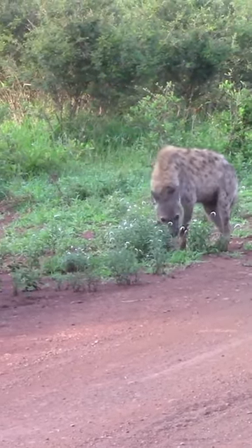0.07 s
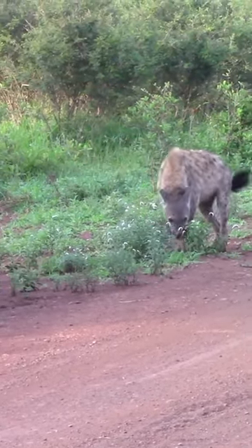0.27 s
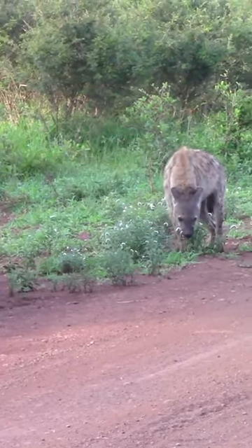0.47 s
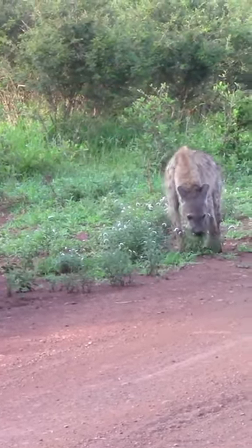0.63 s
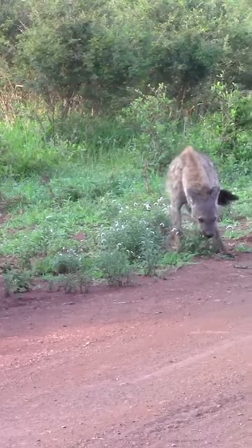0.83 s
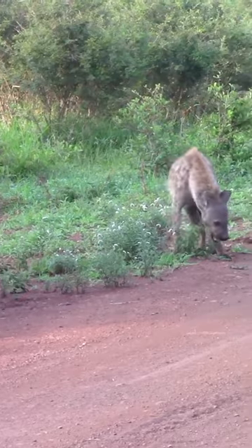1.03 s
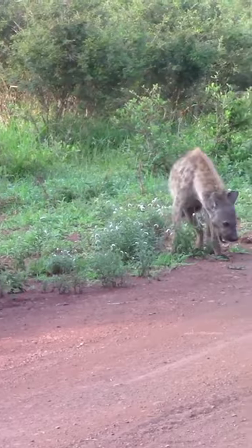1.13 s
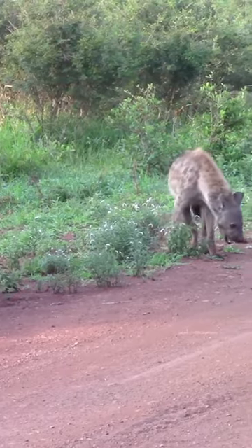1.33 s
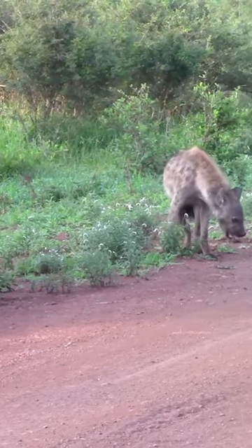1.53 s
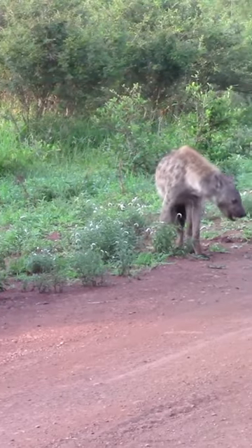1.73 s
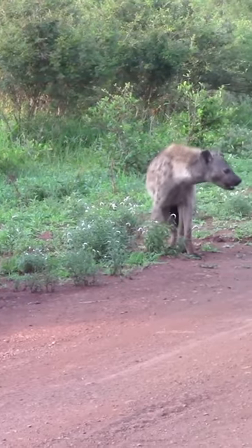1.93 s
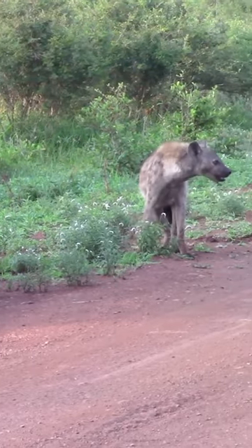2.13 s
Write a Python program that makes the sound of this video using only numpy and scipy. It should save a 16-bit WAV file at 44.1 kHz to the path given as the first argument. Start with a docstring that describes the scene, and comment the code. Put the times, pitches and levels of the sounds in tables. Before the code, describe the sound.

A hyena gives one long whoop a few metres away in open bush. It starts as a soft hoot, swells into a rough growl, then sweeps up to a clear note. Small birds chirp faintly in the distance.

```python
"""A hyena gives one long whoop a few metres away, in open bush beside a dirt road.
The call starts as a clean hoot, the harmonics of the vibrating vocal folds. A second oscillation in the
larynx joins and beats with it into a growl, whose resonances shift as the head is raised. The growl
drops out as the pitch sweeps up to a pure note, and the bushes echo briefly. Throughout, small birds
chirp far off over very quiet air and a faint breeze."""
import sys
import numpy as np
from scipy import signal
from scipy.fft import rfft, irfft
from scipy.io import wavfile
from scipy.ndimage import uniform_filter1d, minimum_filter1d

SR = 44100
rng = np.random.default_rng(int(sys.argv[2]) if len(sys.argv) > 2 else 0)


def store_wav(level_fs):
    """Save 16-bit WAV to argv[1]."""
    pcm = np.round(np.clip(np.atleast_2d(level_fs), -1, 1) * 32767)
    wavfile.write(sys.argv[1], SR, pcm.T.astype(np.int16))


N = 97020
T = np.arange(N) / SR
JITTER_RAD, JITTER_HZ = .22, 60  # phase jitter at full roughness, and its bandwidth


def hyena():
    """Biphonation: two oscillations in one larynx interact. Returns the voice and its hiss."""
    # The hoot. Each row: time in seconds, pitch in Hz, levels of harmonics 1 to 4 in dB.
    hoot_track = [(0, 285, -33.5, -23.5, -38, -27.5), (.05, 296.1, -29.5, -24, -36.5, -39.5),
                  (.236, 300.3, -26.5, -19.5, -33.5, -33), (.39, 306.4, -23, -19, -34, -42.5),
                  (.46, 317.8, -18, -19, -26, -39), (.54, 321.7, -15, -16.5, -23.5, -38.5),
                  (.66, 331, -12, -16.5, -38, -53.5), (.84, 331.8, -12.5, -16.5, -40, -42),
                  (1.02, 340.2, -11.5, -15, -27, -39), (1.08, 335.5, -12, -17, -35, -48.5),
                  (1.12, 341.2, -10, -13.5, -31, -47.5), (1.18, 334.3, -12.5, -18, -34.5, -44),
                  (1.26, 341.9, -11, -15.5, -23.5, -53.5), (1.32, 342.3, -10.5, -12, -37, -57.5),
                  (1.44, 350.6, -10.5, -17, -30.5, -39), (1.56, 362, -9, -11, -38, -42.5),
                  (1.68, 375.5, -16, -24.5, -39.5, -46), (1.75, 388.7, -16, -31, -32.5, -55),
                  (1.8, 422.8, -18, -20.5, -38.5, -39.5), (1.83, 434.4, -7, -32, -47, -43),
                  (1.865, 493.4, -7.5, -26.5, -29, -64.5), (1.902, 535, -7.5, -42.5, -47, -77),
                  (1.93, 494.4, -6, -31, -52.5, -72)]
    # The growl. Each row: time in seconds, relative level in dB, source tilt in dB per octave.
    growl_track = [(0, -49, 6), (.44, -45.5, 15.5), (.5, -24.5, 4), (.56, -12, 5.5), (.66, -11.5, 5),
                   (.86, -9, 2.5), (1.0, -7.5, 3.5), (1.15, -7.5, 1), (1.33, -5.5, 2.5), (1.47, -8, -0.5),
                   (1.62, -4, -3), (1.75, -1.5, -4), (1.81, -2.5, -3), (1.845, -15, 4.5), (1.88, -34, 12.5),
                   (1.93, -24.5, 10.5)]
    # The second oscillation. Each row: time in seconds, ratio of its frequency to the pitch.
    second_ratio = [(.5, .436), (.66, .424), (.76, .428), (1.0, .428), (1.16, .437), (1.25, .426),
                    (1.35, .428), (1.43, .437), (1.6, .444), (1.77, .45), (1.82, .435)]
    # Irregularity of the folds. Each row: time in seconds, roughness from 0 to 1.
    roughness = [(0, .1), (.85, .1), (1.0, .2), (1.12, .6), (1.22, .6), (1.33, .25), (1.46, .5),
                 (1.58, .35), (1.75, .5), (1.85, .9)]
    hz, *harmonic_db = curves(hoot_track)
    growl_db, tilt_db = curves(growl_track)
    ratio, rough = curves(second_ratio)[0], curves(roughness)[0]
    hz = uniform_filter1d(hz, size=600) * (1 + .001 * walk(40))
    phase = 2 * np.pi * np.cumsum(hz) / SR + .06 * rough * walk(JITTER_HZ)
    second = 2 * np.pi * np.cumsum(hz * ratio) / SR + JITTER_RAD * rough * walk(JITTER_HZ)
    coincidence = np.cos(7 * second - 3 * phase)  # slow beat: the ratio lies near 3/7
    tone = hoot(hz, phase, harmonic_db)
    sides = side_tones(phase, second, ratio, rough, tilt_db)
    noise = rasp(hz, coincidence, rough, growl_db, harmonic_db[1])
    growl = throat(undb(growl_db + 1.5 * rough * walk(70)) * sides + noise)
    voice = np.sqrt(2) * (tone + growl) + undb(growl_db - 29) * claps(phase, coincidence, rough)
    attack = np.sin(np.pi / 2 * np.minimum(T / .006, 1)) ** 2
    release = 1 / (1 + np.exp(np.minimum((T - 1.927) / .0025 - 2, 200)))  # the call ends near 1.93 s
    envelope = attack * release
    chest = signal.butter(8, 215, "high", fs=SR, output="sos")
    return signal.sosfiltfilt(chest, voice * envelope, padtype=None), hiss(phase) * envelope


def hoot(hz, phase, harmonic_db):
    """Periodic vibration of the folds gives a harmonic series: four main partials, six faint ones."""
    # Spectral envelope of the upper harmonics. Each row: frequency in Hz, relative level in dB.
    overtones = [(1400, -64.5), (1800, -60.5), (2150, -59), (2400, -71), (2700, -63.5), (3350, -76),
                 (3700, -96)]
    tone = sum(undb(db + .25 * walk(50)) * np.cos(k * phase - 1.2 * k ** 2)
               for k, db in enumerate(harmonic_db, 1))
    fade = np.interp(T, [.4, 1.2, 1.9], [1.3, 1, .1])
    for k in range(5, 11):
        db = np.interp(k * hz, *np.array(overtones).T) + 2 * walk(15)
        tone += fade * undb(db) * np.cos(k * phase + .15 * walk(30))
    return tone


def side_tones(phase, second, ratio, rough, tilt_db):
    """Nonlinear coupling puts sum and difference tones between the harmonics."""
    # Each entry: a signed multiple of the second oscillation's frequency.
    orders = (1, -1, 2, -2, 3, -3, 4, -4)
    # Each entry: the relative level of that order in dB.
    order_db = [3.5, 2, -2, 0.5, -11.5, -5.5, -21.5, -15]
    sides = 0
    for n, db in zip(orders, order_db):
        harmonic_below = np.floor(n * np.median(ratio))
        jitter = JITTER_RAD / 2 * rough * walk(JITTER_HZ)
        beat = n * second - harmonic_below * phase - .27 * n ** 2 + jitter
        tones = sum(undb(tilt_db * np.log2((k + .5) / 2)) * np.cos(k * phase + beat - .15 * k ** 2)
                    for k in range(9))
        sides += undb(db + 1.5 * walk(5)) * tones
    return sides


def claps(phase, coincidence, rough):
    """Impulsive excitation: the folds clap hard when both oscillations close together, and rattle."""
    # Spectrum of a clap. Each row: frequency in Hz, relative level in dB.
    spectrum = [(300, -42), (700, -3), (1200, 7), (1500, 2.5), (1720, -5), (1930, -21.5), (2200, -21.5),
                (2800, -27.5), (3300, -57.5)]
    pulses = sum(np.cos(k * phase) for k in range(1, 11))
    force = np.exp(4 * coincidence) * undb(2 * rough * walk(120))
    return unit(colour(pulses * force, spectrum))


def rasp(hz, coincidence, rough, growl_db, effort_db):
    """Modulated noise: a rasp pulses with the beat, and breath follows the effort of the hoot."""
    pulsing = undb(growl_db - 14) * rough * (1 + .7 * coincidence)
    breath = undb(effort_db - effort_db.max() - 32)
    return rng.standard_normal(N) * (pulsing + breath) * np.sqrt(SR / hz)


def throat(x):
    """Source and filter: the resonances of throat and mouth shift as the animal raises its head."""
    # Response with the head down. Each row: frequency in Hz, gain in dB.
    head_down = [(100, -68), (160, -41), (195, -34), (240, -62), (300, -23), (380, -22), (440, -20.5),
                 (510, -16.5), (610, -18), (715, -16.5), (810, -21), (900, -31.5), (1000, -30.5),
                 (1130, -19), (1165, -30), (1210, -43.5), (1500, -41), (1700, -41.5), (1930, -65),
                 (2170, -52), (2400, -68), (2750, -61.5), (3300, -97.5), (4200, -93.5)]
    # Response with the head raised. Each row: frequency in Hz, gain in dB.
    head_up = [(100, -61), (170, -45), (215, -53), (270, -63.5), (340, -34), (420, -25), (600, -18),
               (760, -22.5), (900, -33.5), (1080, -21), (1200, -36.5), (1400, -35), (1700, -43.5),
               (1950, -62.5), (2200, -57.5), (2800, -71.5), (3300, -101.5)]
    raised = np.interp(T, [1.35, 1.75], [0, 1])
    return (1 - raised) * colour(x, head_down) + raised * colour(x, head_up)


def hiss(phase):
    """Amplitude modulation: treble noise pulses once in each cycle of the folds."""
    # Strength of the hiss. Each row: time in seconds, level in dB.
    level = [(0.0, -70), (0.24, -70), (0.39, -60.5), (1.1, -65), (1.11, -61), (1.68, -78.5), (1.8, -71.5),
             (2.0, -89)]
    # Its spectrum. Each row: frequency in Hz, relative level in dB.
    spectrum = [(2500, -16.5), (3300, 0), (4300, -11.5), (5400, -15), (6200, -1), (6900, -14), (7900, 7),
                (8600, -4), (9600, 1), (11200, 1.5), (12000, -22), (13000, -14)]
    air = rng.standard_normal(N) + .64 * rng.standard_normal((2, N))
    pulsed = colour(air, spectrum) * (1 + .5 * np.cos(phase))
    return undb(curves(level)[0]) * unit(pulsed * undb(2 * walk(25)))


def echoes(call):
    """Reflection: the ground answers first, then the bushes and a thicket, each later and fainter."""
    # Response of the thicket. Each row: frequency in Hz, relative gain in dB.
    response = [(250, -1.5), (400, -1.5), (500, -17.5), (700, 0), (1200, 2.5), (2000, -3.5)]
    ground = undb(-27) * scatter(call, t60=.15)
    bushes = undb(-28) * scatter(delay(call, .03), t60=.16)
    thicket = undb(-40) * scatter(colour(delay(call, .17), response), t60=.02)
    return ground + bushes + thicket


def birds():
    """Scattering by the bushes blurs distant chirps and one nearer trill of falling notes."""
    # Each row: start and length in seconds, first and last frequency in Hz, relative level in dB.
    chirps = [(.01, 0.12, 4680, 3000, -62), (0.02, 0.13, 7000, 6090, -62), (0.146, 0.1, 5570, 5130, -63.5),
              (0.217, 0.055, 4830, 3940, -56.5), (0.334, 0.069, 3880, 3300, -68),
              (0.516, 0.039, 2900, 2720, -47), (0.544, 0.037, 3800, 4385, -57),
              (0.589, 0.044, 3730, 3380, -56), (0.694, 0.032, 2830, 2900, -45),
              (0.751, 0.067, 5300, 5100, -63.5), (0.903, 0.053, 2850, 2641, -44.5),
              (0.954, 0.058, 4470, 4059, -58.5), (1.015, 0.059, 2860, 2700, -47),
              (1.095, 0.075, 7800, 7600, -62.5), (1.11, .07, 6090, 4960, -52.5),
              (1.221, 0.15, 2896, 2500, -47.5), (1.528, 0.11, 5622, 5000, -65.5),
              (1.93, 0.031, 1830, 1654, -49), (2.013, 0.027, 2973, 4800, -63.5),
              (2.063, 0.095, 1390, 1236, -58)]
    waver = 1 + .025 * walk(180)
    song = sum(chirp(*row, waver) for row in chirps)
    trill_start_s, step_s = 1.163, .0188
    trill = sum(chirp(trill_start_s + k * step_s + .00042 * late, .012, 4995.5, 4122.5, -50 + .6 * loud)
                for k, (late, loud) in enumerate(rng.standard_normal((10, 2))))
    trill *= np.clip((T - trill_start_s) / .03 + .2, 0, 1)
    direct = pan(undb(-3) * song, -3) + pan(trill, -13)
    return direct + chorus() + scatter(undb(-1) * song + undb(-2) * trill, t60=.2)


def chirp(start, length, from_hz, to_hz, db, waver=1):
    """Frequency modulation: one bird note glides under a half-sine envelope."""
    progress = np.clip((T - start) / length, 0, 1)
    hz = (from_hz + (to_hz - from_hz) * progress) * waver
    return np.sqrt(2) * undb(db) * np.sin(np.pi * progress) * np.sin(2 * np.pi * np.cumsum(hz) / SR)


def chorus():
    """Incoherent addition: far birds merge into a flickering band of noise."""
    # Strength of the chorus. Each row: time in seconds, level in dB.
    level = [(0, -57), (.28, -61), (.38, -53), (.9, -62), (1.3, -71), (2.2, -78)]
    # Its spectrum. Each row: frequency in Hz, relative level in dB.
    spectrum = [(1500, -22), (2300, 0.5), (2700, 0), (3500, -5.5), (4200, -23.5), (5200, -22.5),
                (7000, -20)]
    return stereo_noise(spectrum, common=1) * undb(curves(level)[0] + 2 * walk(20))


def background():
    """Random pressure fluctuations: still air, and a faint breeze rumbling on the microphone."""
    # Spectrum of the still air. Each row: frequency in Hz, relative level in dB.
    air_spectrum = [(30, 3.5), (200, 3.5), (500, 3.5), (1300, -1), (2200, -7), (4500, -3.5), (6000, -11),
                    (11000, -23), (13000, -29)]
    # Spectrum of the breeze. Each row: frequency in Hz, relative level in dB.
    wind_spectrum = [(20, -1), (40, -1), (100, -8), (170, -7.5), (300, -28)]
    # Swell of the breeze. Each row: time in seconds, level in dB.
    breeze = [(0, -83.5), (.6, -80.5), (.92, -63), (1.2, -63), (1.4, -74), (2.2, -94)]
    air, wind = stereo_noise(air_spectrum, common=2.7), stereo_noise(wind_spectrum, common=2.7)
    return undb(-67.5 + walk(4.8)) * air + undb(curves(breeze)[0] + 5.1 * walk(12)) * wind


def stereo_noise(spectrum, common):
    """Partial coherence: each ear has its own noise plus a share common to both."""
    return unit(colour(rng.standard_normal((2, N)) + common * rng.standard_normal(N), spectrum))


def scatter(x, t60):
    """Diffuse reflection: a noise tail, different at each ear, decays by 60 dB in t60 seconds."""
    t = T[:SR // 2]
    tail = rng.standard_normal((2, len(t))) * undb(-60 * t / t60) * (t > .004)
    tail /= np.sqrt(np.sum(tail ** 2, axis=1, keepdims=True))
    return signal.fftconvolve(x[None], tail)[:, :N]


def colour(x, points):
    """Minimum-phase filtering through the given (Hz, dB) points."""
    hz, db = np.array(points, float).T
    size = 2 * N
    gain = undb(np.interp(np.log(np.arange(N + 1) * SR / size + 1), np.log(hz), db))
    cepstrum = irfft(np.log(gain))
    causal = np.r_[cepstrum[0], 2 * cepstrum[1:N]]
    return irfft(rfft(x, size) * np.exp(rfft(causal, size)))[..., :N]


def delay(x, seconds):
    """Travel time along a longer path."""
    return np.interp(T - seconds, T, x, left=0)


def pan(x, db):
    """A level difference between the ears places a sound left (+) or right (-)."""
    return x * undb(np.array([[db], [-db]]) / 2)


def walk(hz):
    """Low-passed noise: a smooth random fluctuation of rms 1."""
    lowpass = signal.butter(2, hz, fs=SR, output="sos")
    return unit(signal.sosfilt(lowpass, rng.standard_normal(2 * N))[N:])


def curves(rows):
    """Linear interpolation of each column against the first, time."""
    times, *columns = np.array(rows, float).T
    return [np.interp(T, times, column) for column in columns]


def unit(x):
    """Scale to rms 1."""
    return x / np.sqrt(np.mean(x ** 2))


def undb(db):
    """Decibels to amplitude ratio."""
    return 10 ** (np.asarray(db) / 20)


def scene():
    """Superposition of the call, its echoes, the birds and the air."""
    call, call_hiss = hyena()
    return pan(call, -2) + call_hiss + echoes(call) + birds() + background()


def record(dry):
    """Limiting: a smooth gain holds down peaks beyond full scale; a low-pass cuts above 13 kHz."""
    gain = minimum_filter1d(1 / np.maximum(np.abs(dry).max(axis=0), 1), size=1400)
    gain = uniform_filter1d(uniform_filter1d(gain, size=700), size=700)
    return signal.sosfilt(signal.ellip(10, .1, 80, 13000, fs=SR, output="sos"), dry * gain)


dry = scene()
out = record(dry)
store_wav(out)
```